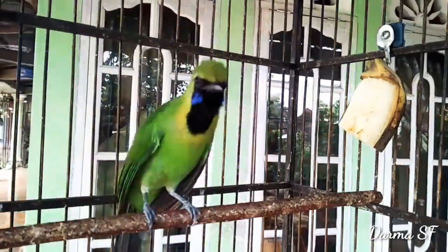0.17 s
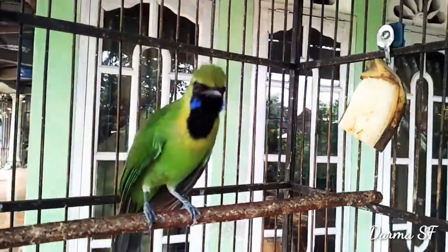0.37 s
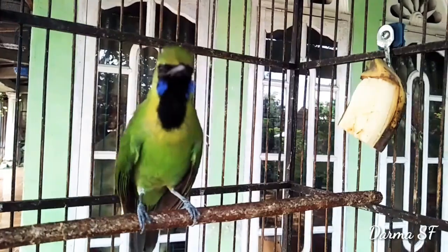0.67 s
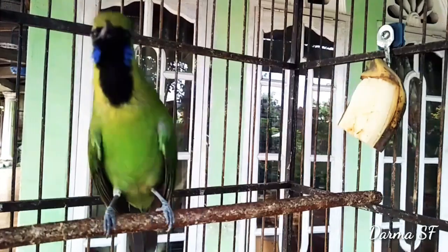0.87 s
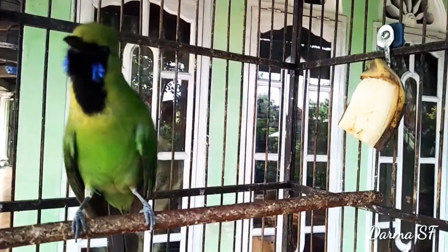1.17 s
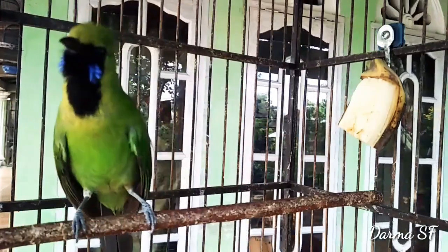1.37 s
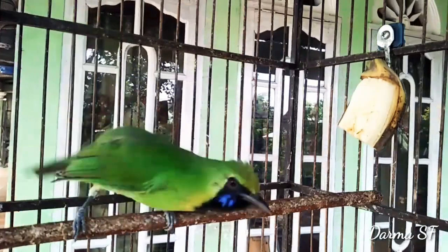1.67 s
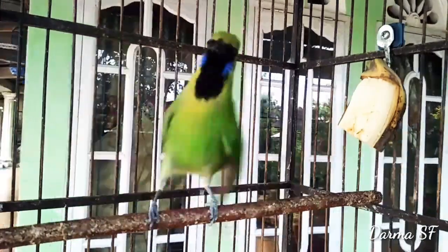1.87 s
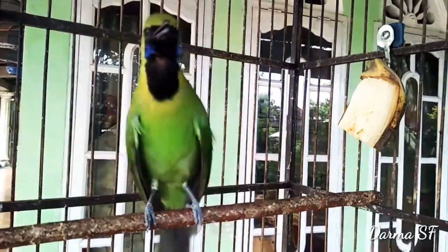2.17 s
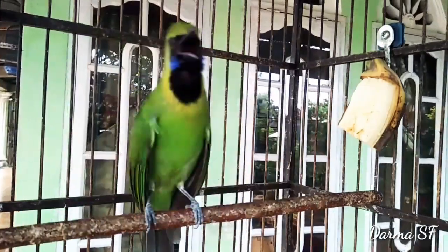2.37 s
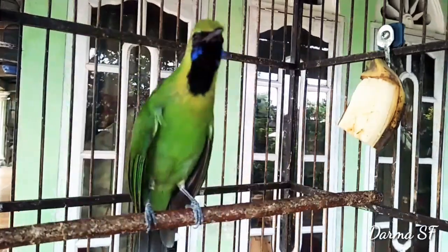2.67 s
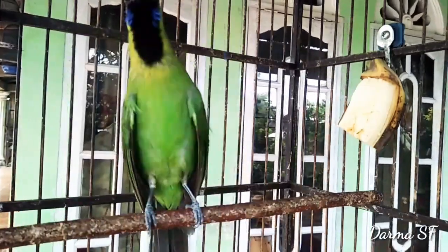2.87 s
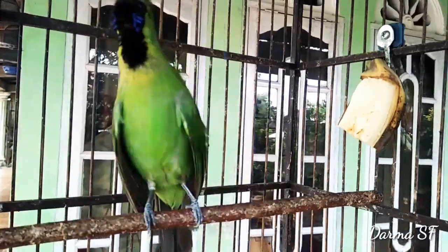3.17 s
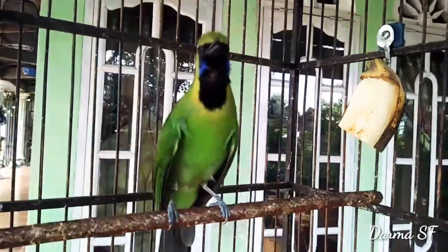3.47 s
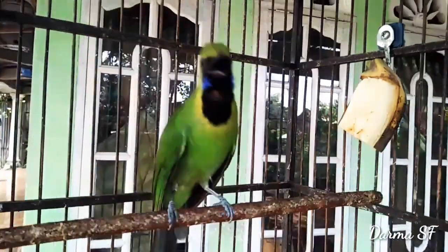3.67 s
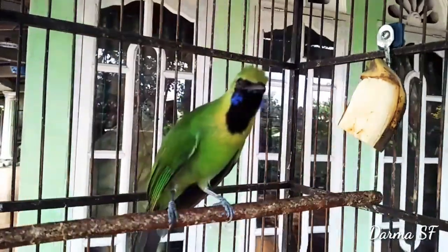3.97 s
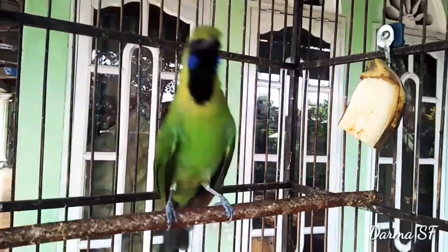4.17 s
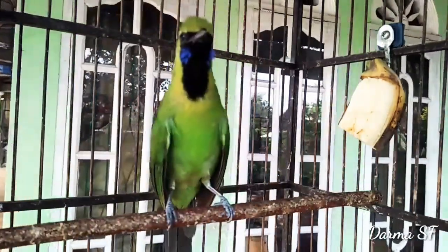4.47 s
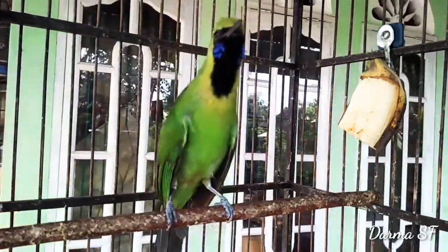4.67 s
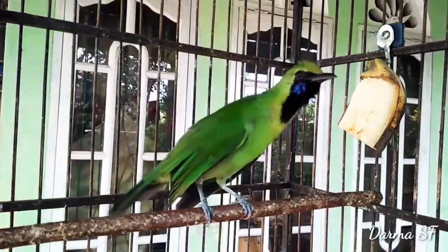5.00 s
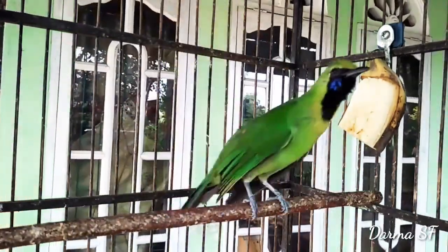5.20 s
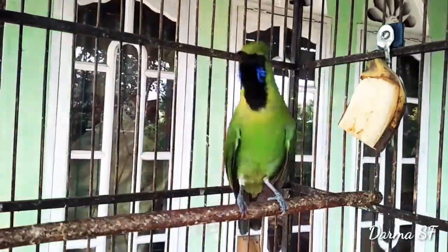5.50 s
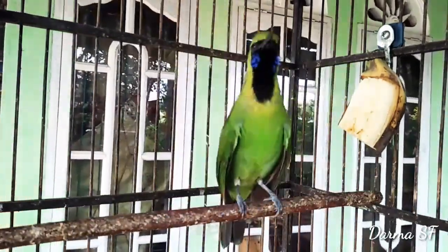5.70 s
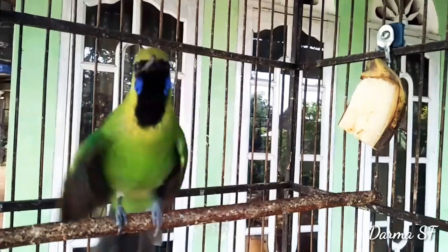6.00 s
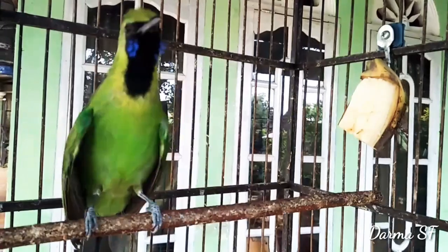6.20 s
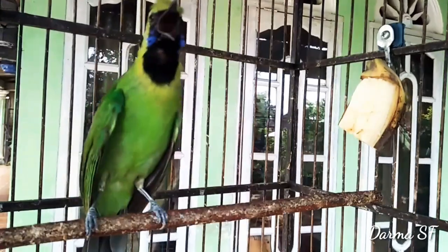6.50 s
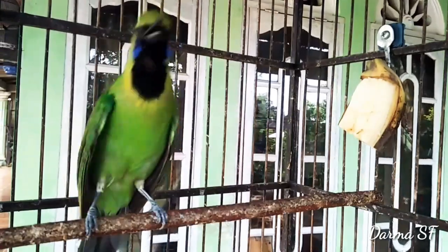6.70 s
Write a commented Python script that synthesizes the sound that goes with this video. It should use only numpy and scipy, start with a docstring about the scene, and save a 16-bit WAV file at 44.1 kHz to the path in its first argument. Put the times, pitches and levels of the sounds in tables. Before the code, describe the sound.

Three sharp, sliding whistles come in quick succession from a songbird in a nearby cage. Quiet gliding notes fill the gaps between three loud bursts of rapid chirping: the first two climb from clean chips into a rasp, and the last is shrill throughout. The bird is close, with a short echo off hard walls, while a faint low rumble of traffic lies far behind.

```python
"""A caged leafbird sings close to the microphone in a small hard-walled space: three loud slurred
whistles, then volleys of arched chips that rise and turn raspy, with soft twittering in between.
Its syrinx makes a near-sine whose overtones flare in the resonance of throat and beak; forcing
a chip lifts its pitch and breaks it into a rasp. Nearby walls echo every note. Far traffic rumbles
and hums underneath, and a faint distant tone is held near the end."""
import sys
import numpy as np
from scipy import signal
from scipy.fft import rfft, irfft
from scipy.io import wavfile
from scipy.ndimage import uniform_filter1d

SR = 44100
rng = np.random.default_rng(int(sys.argv[2]) if len(sys.argv) > 2 else 0)


def digitize_waveform(pressure):
    """Quantize a signal to 16-bit integers and store it at the path in sys.argv[1].

    Rows of a 2-D input are taken as channels; values are limited to [-1, 1].
    """
    field = np.atleast_2d(pressure).T
    bounded = np.clip(field, -1, 1)
    quanta = np.round(bounded * 32767).astype(np.int16)
    wavfile.write(sys.argv[1], SR, quanta)


N = 302085
TIME = np.arange(N) / SR


# overtone strength leaving the bird's throat and beak: (frequency [Hz], level [dB])
THROAT = [(3500, -18), (5500, -29), (6500, -22), (8000, -14.5), (9000, -8), (9750, -4), (10400, -8),
          (12000, -23), (14500, -25.5)]

def syrinx(hz, overtone_db):
    """A near-sine whose overtones flare as they cross the resonance of throat and beak."""
    phase = 2 * np.pi * np.cumsum(hz) / SR
    out = np.sin(phase)
    for k in range(2, 6):
        db = curve(k * hz, THROAT) + overtone_db - 9 * max(k - 3, 0)
        out += undb(db) * (k * hz < SR / 2) * np.sin(k * phase)
    return np.sqrt(2) * out


# loud whistles, close to the microphone:
# (middle of slur [s], slur time [s], from [Hz], to [Hz], warble depth [Hz])
WHISTLES = [(0.0558, 0.006, 3693, 4780, 134), (.146, .0095, 4650, 3237, 1), (0.301, 0.013, 3613, 2118, 1.5)]
# loudness and overtone strength of each whistle, as heard at the microphone:
# (time [s], level [dB], strongest overtone [dB re fundamental])
WHISTLE_LEVELS = [
    [(0.0, -13, -15), (0.018, -13, -16), (0.046, -7, -23.5), (0.062, -14, 4), (0.072, -24, -6.5)],
    [(0.135, -39, 2.5), (0.153, -16, -14), (0.165, -10.5, -17), (0.185, -21, 7.5), (0.207, -11.5, -8.5),
     (0.225, -31, -21.5)],
    [(0.275, -24, -20.5), (0.289, -29, -3.5), (0.301, -9.5, -22), (0.335, -21, -28.5), (0.348, -25, -25)],
]
# air in the whistles, heard at close range: (frequency [Hz], level [dB])
WHISTLE_AIR = [(300, -13), (2000, -9.5), (5000, -9), (8000, -7.5), (10500, -3), (13500, -7.5)]

def whistles(warble_hz=152, scatter=0.0053, slide_scatter=0.015, air_db=-36, gain_db=1.5):
    """Clean slurs with a trace of air; the first opens with a fast warble that dies as it slides."""
    out = np.zeros(N)
    for (slur_s, slur_time, from_hz, to_hz, depth_hz), levels in zip(WHISTLES, WHISTLE_LEVELS):
        times, *columns = np.transpose(levels)
        t = np.arange(times[0], times[-1], 1 / SR)
        db, overtone_db = (np.interp(t, times, column) for column in columns)
        slid = 1 / (1 + np.exp((slur_s - t) / slur_time))
        jitter = (scatter + slide_scatter * 4 * slid * (1 - slid)) * wander(len(t), 640)
        warble = depth_hz * (1 - slid) * np.sin(2 * np.pi * warble_hz * t)
        hz = between((from_hz, to_hz), slid) * (1 + jitter) + warble
        strongest_db = np.maximum(curve(2 * hz, THROAT), curve(3 * hz, THROAT))
        tone = syrinx(hz, overtone_db - strongest_db)
        air = undb(air_db) * unit(colour(rng.standard_normal(len(t)), WHISTLE_AIR))
        add(out, times[0], (tone + air) * undb(db + gain_db) * signal.windows.tukey(len(t), .08))
    return out


# the arch of every chip, at the bird: (time from top [chip lengths], pitch [share of top], level [dB])
ARCH = [(-.42, 0.2818, -23), (-.26, .46, -10), (-.13, .71, -3.5), (0, 0.98, -3.5), (.11, .83, -0.5),
        (.25, .62, -1.5), (.4, .49, -3), (0.57, .42, -20.5)]

def arch(length, force, rasp, depth, flutter_db=7, forced_fade_db=16):
    """One fluttering sweep up and down, unsteady as it starts; tone and turbulence ring the throat."""
    top_hz = between((3592, 4837), force ** .65)  # the pitch answers force early, the throat late
    throat_hz = between((2640, 4730), force ** 2.03)
    place, share, db = np.transpose(ARCH)
    u = np.arange(place[0], place[-1], 1 / (length * SR))
    sweep = uniform_filter1d(np.interp(u, place, 1 - depth * (1 - share)), size=100)
    scatter = 0.015 + 0.105 * rasp + .32 * np.maximum(-u, 0)
    hz = top_hz * sweep * (1 + scatter * wander(len(u), 1350))
    turbulence = undb(-3) * rasp * unit(ring(rng.standard_normal(len(u)), throat_hz, width_hz=1800))
    fade_db = forced_fade_db * force * np.maximum(u, 0)  # a forced chip spends its breath early
    gain = undb(np.interp(u, place, db) - fade_db + flutter_db * np.tanh(wander(len(u), 280)))
    source = (syrinx(hz, overtone_db=5) + turbulence) * gain
    return ring(source, throat_hz, width_hz=750) + undb(-11) * source


# three volleys from the cage, close up: (time of top [s], length [s], force [0-1], level [dB])
CHIPS = [ (2.195, 0.04, 0, -15.5), (2.276, 0.034, 0.07, -16), (2.355, .031, 0.2, -13.5),
         (2.435, 0.033, 0.26, -15.5), (2.517, 0.032, .4, -14.5), (2.598, 0.031, 0.84, -13.5),
         (2.669, 0.032, 0.86, -13), (2.75, .026, 0.86, -14), (3.606, 0.041, 0.06, -17.5),
         (3.695, 0.037, 0.08, -16), (3.776, 0.032, 0.23, -13), (3.858, 0.029, 0.27, -13),
         (3.94, .030, 0.53, -13.5), (4.019, .028, .82, -12.5), (4.095, 0.026, 0.86, -12.5),
         (6.584, .031, .74, -11.5), (6.636, 0.049, 0.9, -13.5), (6.695, 0.045, 0.95, -13.5),
         (6.762, 0.031, .95, -13.5), (6.842, 0.037, 0.87, -15.5)]
# the puff of air in each chip: (time from top [chip lengths], level [dB])
CHIP_AIR = [(-1, -42), (-0.37, -28), (-0.13, -5), (-0.08, -.5), (0.13, -1.5), (0.42, -9.5), (0.5, -32)]
# hiss of the rasp at close range: (frequency [Hz], level [dB])
RASP = [(200, -29.5), (900, -20), (2000, -19.5), (4500, 7.5), (6500, -3.5), (8000, 1.5), (9800, 9.5),
        (11500, 0.5), (14000, -11)]
# shrill edge of the most forced chips: (frequency [Hz], level [dB])
SHRILL = [(5000, -52.5), (8000, -21.5), (12500, 13), (14500, -21)]

def chips(second_lag=.08, second_stretch=1.15):
    """Both sides of the syrinx sweep, the second slower and shallower; force adds a shrill rasp."""
    voice, hiss_gain, shrill_gain = np.zeros((3, N))
    lead = ARCH[0][0]
    for top_s, length, force, db in CHIPS:
        rasp = undb(between((-21.5, -3), force))
        first = arch(length, force, rasp, depth=.99)
        add(voice, top_s + lead * length, undb(db) * first)
        second = arch(second_stretch * length, force, rasp, depth=.76)
        second *= 2 * np.linspace(0, 1, len(second)) ** 1.41  # swells late to carry the chip's end
        add(voice, top_s + (second_lag + lead * second_stretch) * length, undb(db - 4) * second)
        u = np.arange(CHIP_AIR[0][0], CHIP_AIR[-1][0], 1 / (length * SR))
        air = rasp * undb(db + curve(u, CHIP_AIR) + 2 * wander(len(u), 700))
        add(hiss_gain, top_s + u[0] * length, air)
        add(shrill_gain, top_s + u[0] * length, air * rasp)
    hiss = hiss_gain * unit(colour(rng.standard_normal(N), RASP))
    shrill = shrill_gain * unit(colour(rng.standard_normal(N), SHRILL))
    return undb(-0.55) * voice + undb(3.5) * hiss + undb(-1) * shrill


# soft notes, faint at the microphone:
# (start [s], length [s], from [Hz], to [Hz], level [dB], pitch scatter [share])
TWITTERS = [ (0, 0.069, 2340, 2050, -41.5, 0.027), (0.189, 0.054, 2395, 1904, -39, 0.024),
            (.35, 0.13, 1560, 1870, -44.5, 0.011), (0.359, .08, 4674, 5200, -44.5, 0.009),
            (0.379, 0.046, 5500, 6180, -43.5, 0.026), (.412, 0.062, 5130, 5503, -33.5, .012),
            (0.46, 0.069, 5460, 5370, -48.5, .015), (0.552, 0.06, 1775, 1970, -44, 0.016),
            (0.927, .11, 2484, 2245, -50.5, 0.059), (1.202, 0.049, 2398, 2427, -45.5, 0.04),
            (1.252, 0.043, 2370, 1897, -45, 0.084), (1.259, 0.074, 5730, 5640, -58, 0.047),
            (1.419, 0.071, 2500, 2570, -45.5, 0.042), (1.464, 0.054, 2220, 2040, -44.5, 0.053),
            (1.73, 0.06, 6670, 6320, -61.5, 0.044), (1.743, 0.13, 3604, 3680, -67, 0.013),
            (1.913, 0.38, 4280, 4300, -67.5, 0.011), (3.017, 0.042, 1378, 1390, -48, 0.017),
            (3.446, .081, 2066, 2020, -62, 0.0048), (4.901, .062, 7480, 7450, -46, 0.036),
            (5.012, 0.038, 7280, 7950, -44, 0.035), (5.036, 0.056, 6890, 7380, -48, 0.053),
            (5.255, .086, 6710, 6400, -61.5, 0.039), (5.316, .13, 4440, 3500, -65.5, .013),
            (5.786, 0.066, 4800, 4330, -59, 0.035), (5.659, .13, 2510, 2504, -67, 0.017),
            (5.799, 0.25, 2720, 3030, -62, 0.033), (5.956, 0.044, 7420, 5750, -47, 0.048),
            (5.943, .075, 4940, 4220, -60, 0.066), (6.067, .06, 3070, 3280, -56, 0.018),
            (6.082, 0.077, 2550, 2584, -52.5, 0.016), (6.059, 0.089, 1488, 1636, -59.5, .008),
            (6.402, 0.28, 3600, 4047, -50.5, 0.013), (6.439, 0.12, 2590, 2600, -54.5, 0.054),
            (6.431, 0.11, 1618, 1754, -54.5, 0.023)]

def twitters(bow_share=0.0084):
    """Quiet gliding notes, some pure and some hoarse, each bowing slightly upward in its middle."""
    out = np.zeros(N)
    for start, length, from_hz, to_hz, db, scatter in TWITTERS:
        u = np.linspace(0, 1, int(length * SR))
        bow = np.sin(np.pi * u)
        hz = between((from_hz, to_hz), u) * (1 + bow_share * bow + scatter * wander(len(u), 230))
        add(out, start, syrinx(hz, overtone_db=-12) * undb(db) * bow)
    return out


# hissy notes and rustles in the same space: (start [s], length [s], centre [Hz], level [dB])
RUSTLES = [(1.004, 0.088, 8000, -65.5), (1.244, .19, 8980, -60), (1.719, .21, 9400, -68.5),
           (1.94, 0.82, 9300, -64.5), (2.95, .085, 1900, -57), (3.262, 0.085, 1980, -59.5),
           (3.256, 0.21, 8840, -62), (3.435, 0.028, 4060, -60.5), (4.56, .093, 7120, -70),
           (4.911, 0.34, 9260, -64.5), (5.275, .21, 9500, -71), (5.798, .115, 8500, -52.5),
           (5.947, 0.084, 8500, -55.5), (6.136, 0.43, 9000, -67), (6.248, 0.057, 695, -59.5)]

def rustles(flicker_db=2.7):
    """Short, faint swells of hiss; the higher the band, the wider it is."""
    out = np.zeros(N)
    for start, length, hz, db in RUSTLES:
        u = np.linspace(0, 1, int(length * SR))
        width_hz = 3960 * np.sqrt(hz / 9000)
        band = unit(ring(ring(rng.standard_normal(len(u)), hz, width_hz), hz, width_hz))
        add(out, start, band * undb(db + flicker_db * wander(len(u), 90)) * np.sin(np.pi * u ** 0.61))
    return out


# echoes from surfaces near the cage and microphone: (delay [s], level [dB])
ECHOES = [(.0031, -14), (.0062, -19), (.0098, -19)]
# reverberation of the small hard-walled space: (frequency [Hz], level [dB])
REVERB = [(300, -3), (1500, 7), (2600, -3.5), (4300, -0.5), (6500, -1), (9500, -4), (14000, -6)]

def room(x, scatter_db, scatter_t60, reverb_db, reverb_t60):
    """The walls return a few distinct echoes, a diffuse scatter and a short coloured reverberation."""
    t = TIME[:SR]
    scatter = rng.standard_normal(SR) * undb(-60 * t / scatter_t60) * (t > .002)
    reverb = colour(rng.standard_normal(SR), REVERB) * undb(-60 * t / reverb_t60) * (t > .012)
    response = (undb(scatter_db) * unit(scatter) + undb(reverb_db) * unit(reverb)) / np.sqrt(SR)
    response[0] += 1  # the direct path
    for delay, db in ECHOES:
        response[int(delay * SR)] += undb(db)
    return signal.fftconvolve(x, response)[:N]


# traffic passing far off: (middle [s], length [s], engine pitch [Hz], hum [dB], rumble [dB])
TRAFFIC = [(.9, 1.85, 92.4, -56.5, -59.5), (2.404, .8, 89.5, -65, -61.5), (3.164, 0.84, 89.7, -56, -55),
           (5.08, 0.57, 112, -60.5, -76), (5.65, 0.17, 112, -61.5, -76.5), (5.93, .3, 86, -69, -65)]
# the ambience of the place, at the microphone: (frequency [Hz], level [dB])
AMBIENCE = [(25, -18.5), (42, -3), (60, -2.5), (105, 3), (200, -17), (300, -15.5), (372, -27.5),
            (440, -11.5), (540, -20.5), (850, -11), (1400, -20.5), (2300, -28), (3500, -46.5), (9000, -38),
            (14000, -49.5)]

def traffic_rumble(floor_db=-64.5, split_hz=220):
    """A low rumble that surges with the traffic, under the faint wash of the surroundings."""
    noise = colour(rng.standard_normal(N), AMBIENCE)
    low, wash = (unit(signal.sosfilt(signal.butter(4, split_hz, kind, fs=SR, output="sos"), noise))
                 for kind in ("low", "high"))
    surge = drift(15)
    passing_power = sum((undb(db) * swell(middle, length)) ** 2 for middle, length, _, _, db in TRAFFIC)
    low_gain = np.sqrt(undb(floor_db) ** 2 + passing_power) * undb(2 * surge)
    return low * low_gain + wash * undb(floor_db + 0.74 * surge)


def engines(waver):
    """Far engines hum unevenly, each with a weaker partial below and above its pitch."""
    out = np.zeros(N)
    for middle, length, hz, db, _ in TRAFFIC:
        phase = 2 * np.pi * np.cumsum(hz * (1 + 0.025 * waver)) / SR
        hum = np.sin(phase) + undb(-12) * (np.sin(phase * 2 / 3) + np.sin(phase * 5 / 3))
        out += undb(db) * swell(middle, length) * hum
    return np.sqrt(2) * out


# partials of a held tone, far from the microphone: (frequency [Hz], level [dB])
FAR_TONE = [(452, -68), (861, -62.5), (1572, -68), (2094, -68), (2622, -73), (3666, -81), (4727, -82),
            (5250, -85), (5780, -85), (6830, -84), (7360, -82)]

def far_tone(waver, flicker_db=3):
    """A faint wavering tone swells for a moment, each partial flickering on its own."""
    out = np.zeros(N)
    for hz, db in FAR_TONE:
        phase = 2 * np.pi * np.cumsum(hz * (1 + 0.00596 * waver)) / SR
        out += undb(db + flicker_db * np.roll(waver, rng.integers(N))) * np.sin(phase)
    return np.sqrt(2) * out * swell(middle_s=6.485, length_s=0.86)


def undb(db):
    """Decibels to gain."""
    return 10 ** (np.asarray(db) / 20)


def unit(x):
    """Scale to rms 1."""
    return x / np.sqrt(np.mean(x ** 2))


def add(out, start, x):
    """Mix x into out from a time in s."""
    i = max(int(start * SR), 0)
    out[i:i + len(x)] += x[:max(N - i, 0)]


def between(ends, share):
    """The value a share of the way from one end to the other."""
    return ends[0] + (ends[1] - ends[0]) * share


def curve(x, points):
    """The value at x on straight lines through the points."""
    return np.interp(x, *np.transpose(points))


def colour(x, points):
    """Shape a sound by (frequency [Hz], level [dB]) points."""
    hz, db = np.transpose(points)
    f = np.maximum(np.fft.rfftfreq(len(x), 1 / SR), 1)
    return irfft(rfft(x) * undb(np.interp(np.log(f), np.log(hz), db)), len(x))


def ring(x, hz, width_hz):
    """A single resonance with gain 1 at its centre."""
    return signal.lfilter(*signal.iirpeak(hz, hz / width_hz, fs=SR), x)


def swell(middle_s, length_s):
    """A rounded rise and fall of gain, 0 outside its length."""
    return np.maximum(1 - (2 * (TIME - middle_s) / length_s) ** 2, 0) ** .75


def wander(count, hz):
    """Smooth random motion of spread 1 for one note, moving at up to hz."""
    lowpass = signal.butter(2, hz, fs=SR, output="sos")
    return unit(signal.sosfilt(lowpass, rng.standard_normal(SR)))[-count:]


def drift(hz):
    """Slow random motion of spread 1 for the whole scene, moving at up to hz."""
    return unit(colour(rng.standard_normal(N), [(hz, 0), (6 * hz, -60), (60 * hz, -120)]))


def scene():
    """One microphone: the bird close by in its room, the traffic and the held tone far behind."""
    song = room(whistles(), scatter_db=-18.5, scatter_t60=.09, reverb_db=-21, reverb_t60=.31)
    volleys = room(chips(), scatter_db=-11.5, scatter_t60=.07, reverb_db=-18, reverb_t60=.3)
    soft = room(twitters() + rustles(), scatter_db=-2, scatter_t60=.3, reverb_db=-5.5, reverb_t60=.062)
    bird = undb(-0.9) * song + undb(-1.5) * (volleys + soft)
    rumble = traffic_rumble()
    waver = drift(4)
    return (bird + rumble + engines(waver) + undb(-2) * far_tone(waver))[None]


def record(dry, ceiling=.7, top_hz=14400):
    """The recorder rounds the loudest peaks and cuts the highest treble."""
    rounded = dry / (1 + (dry / ceiling) ** 8) ** (1 / 8)
    return signal.sosfilt(signal.ellip(12, .2, 80, top_hz, fs=SR, output="sos"), rounded)


dry = scene()
out = record(dry)
digitize_waveform(out)
```